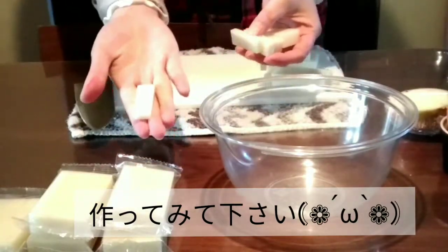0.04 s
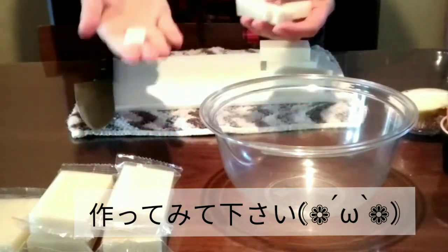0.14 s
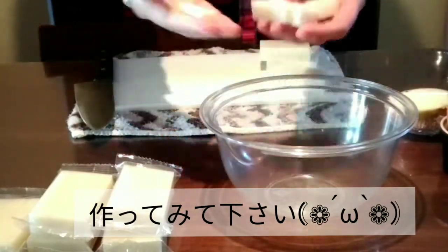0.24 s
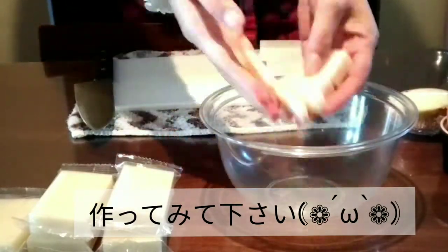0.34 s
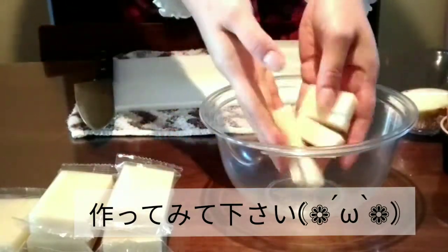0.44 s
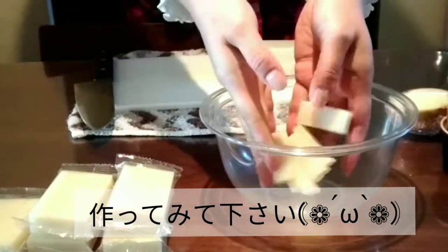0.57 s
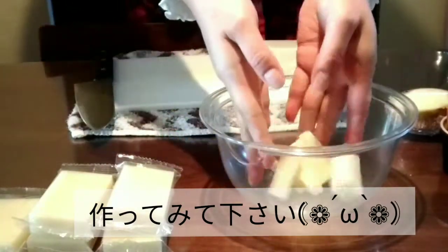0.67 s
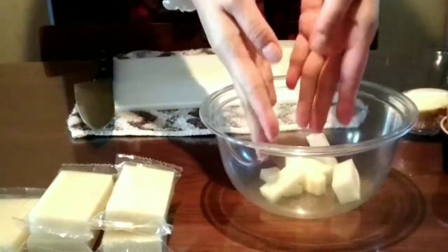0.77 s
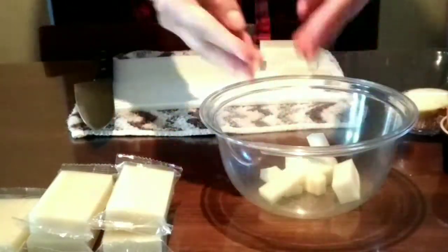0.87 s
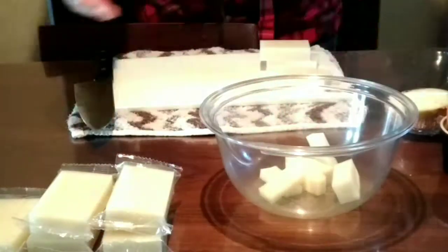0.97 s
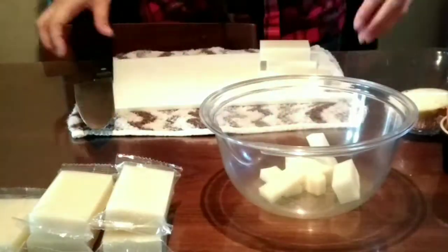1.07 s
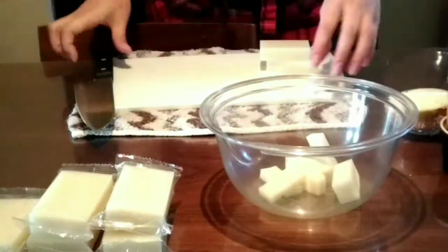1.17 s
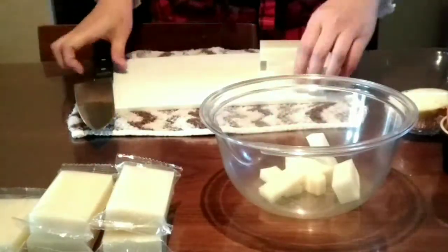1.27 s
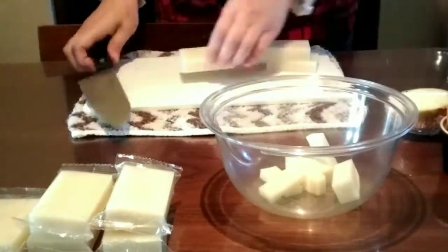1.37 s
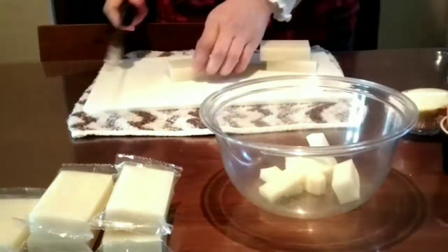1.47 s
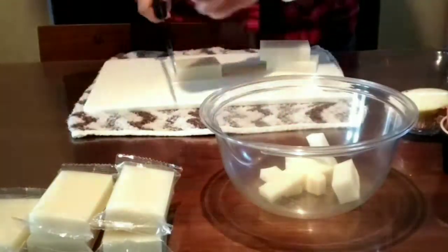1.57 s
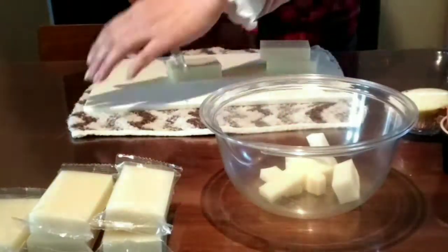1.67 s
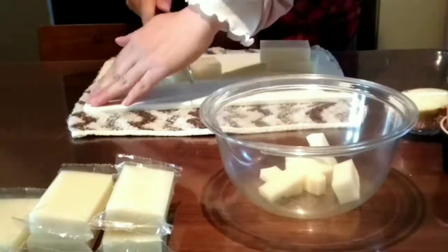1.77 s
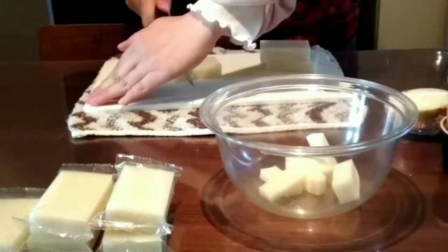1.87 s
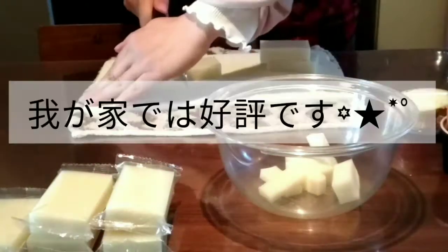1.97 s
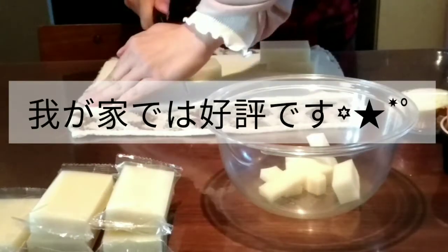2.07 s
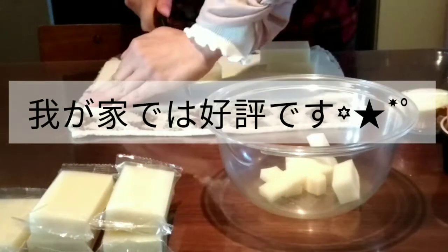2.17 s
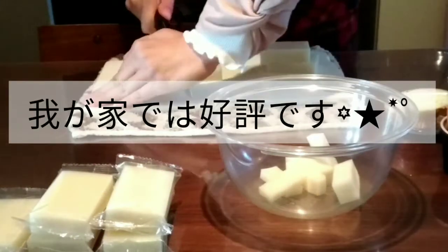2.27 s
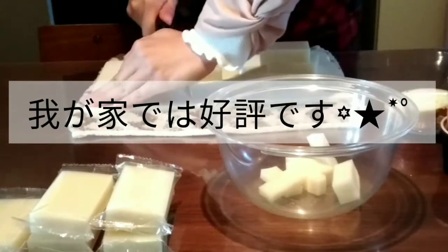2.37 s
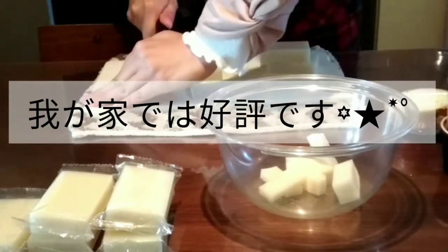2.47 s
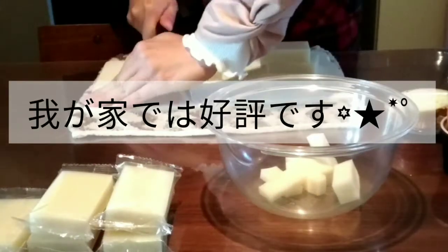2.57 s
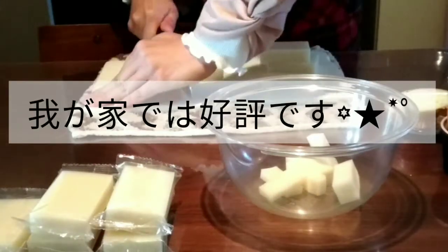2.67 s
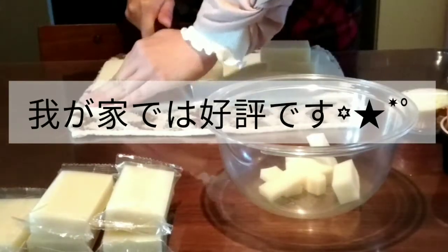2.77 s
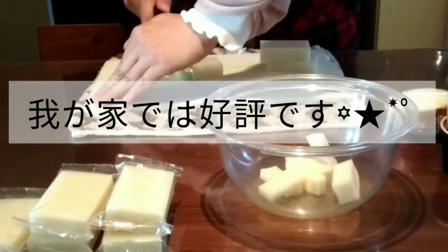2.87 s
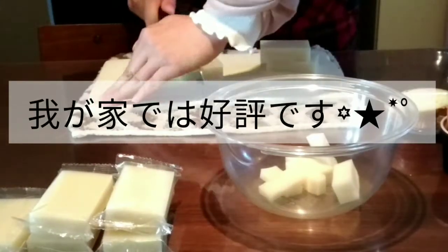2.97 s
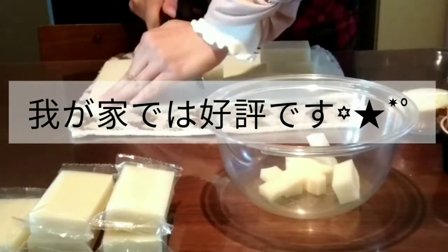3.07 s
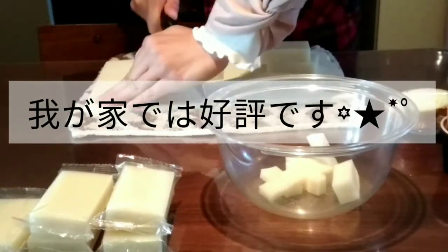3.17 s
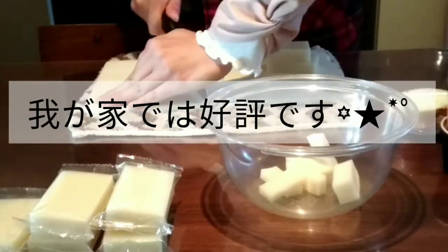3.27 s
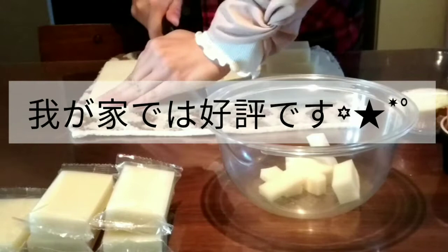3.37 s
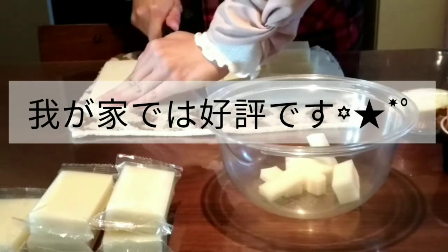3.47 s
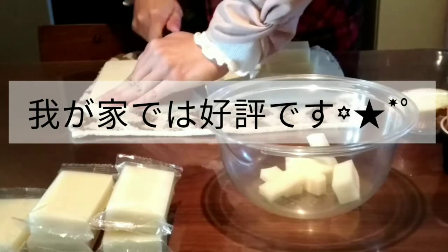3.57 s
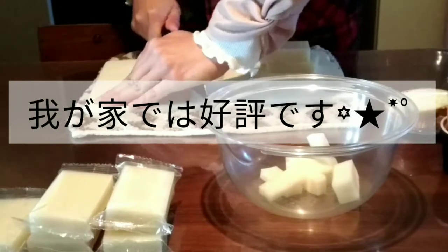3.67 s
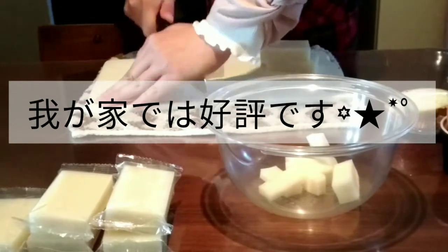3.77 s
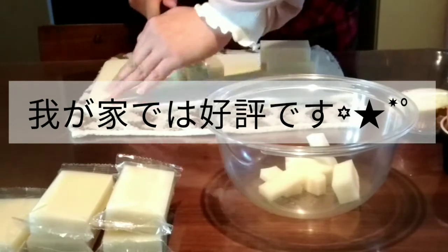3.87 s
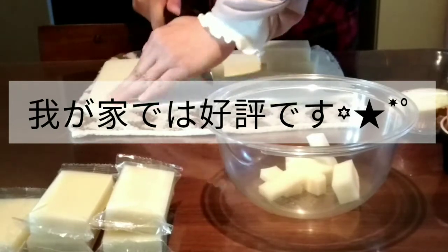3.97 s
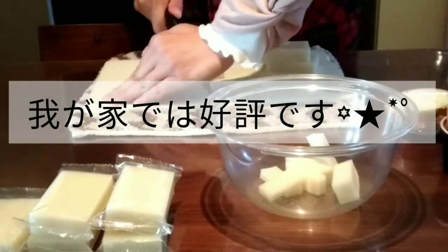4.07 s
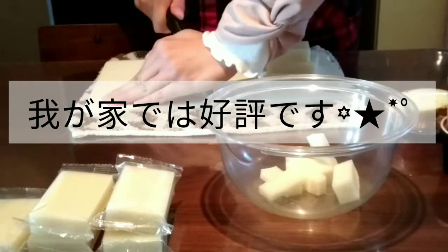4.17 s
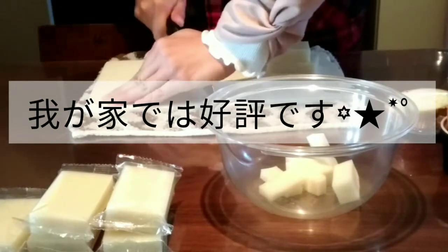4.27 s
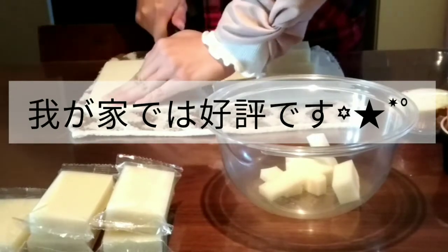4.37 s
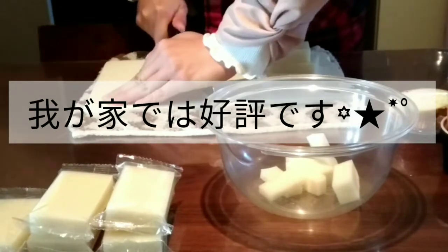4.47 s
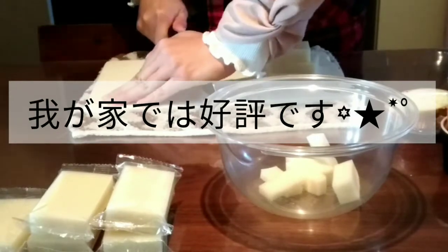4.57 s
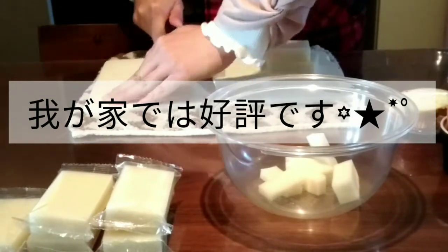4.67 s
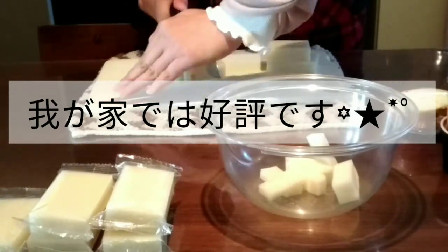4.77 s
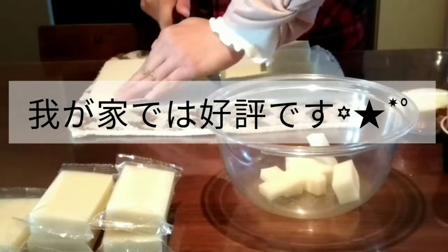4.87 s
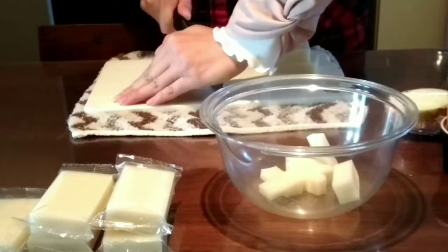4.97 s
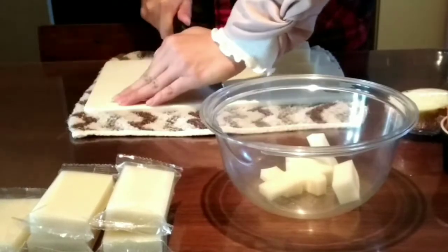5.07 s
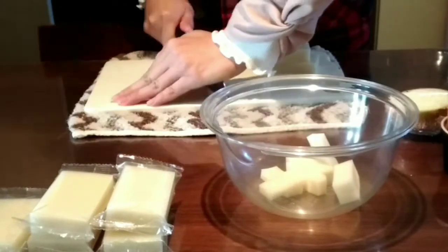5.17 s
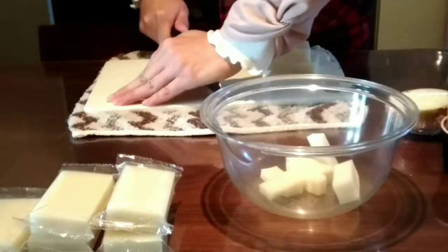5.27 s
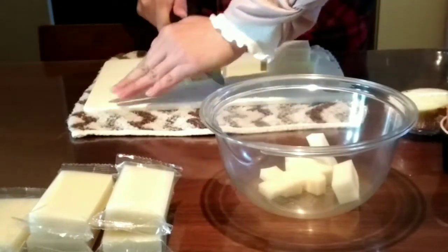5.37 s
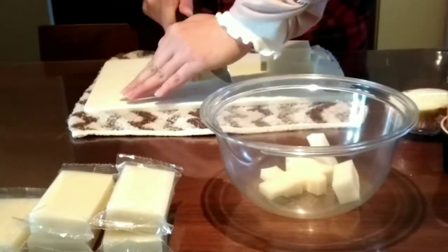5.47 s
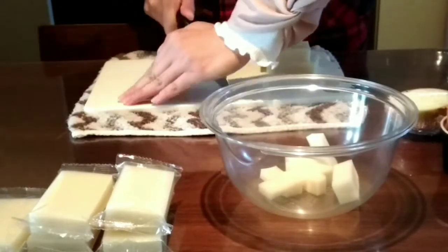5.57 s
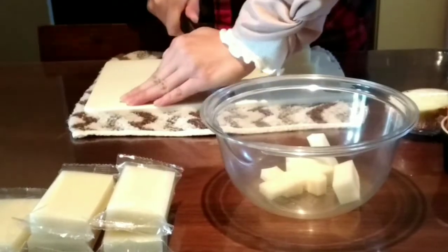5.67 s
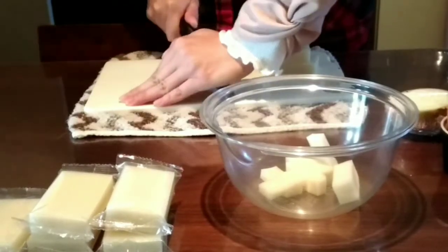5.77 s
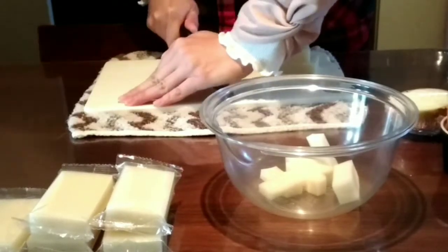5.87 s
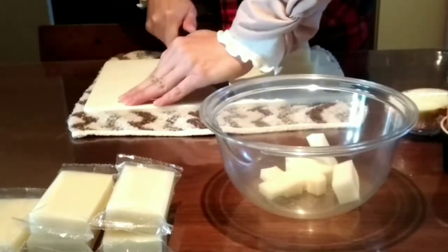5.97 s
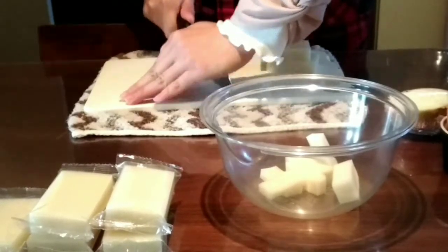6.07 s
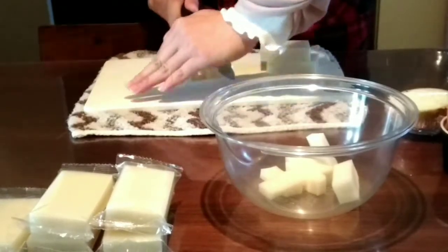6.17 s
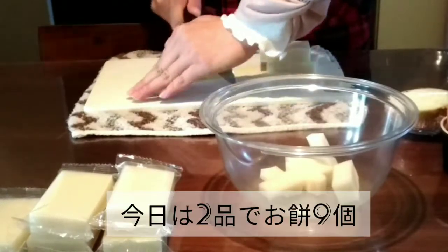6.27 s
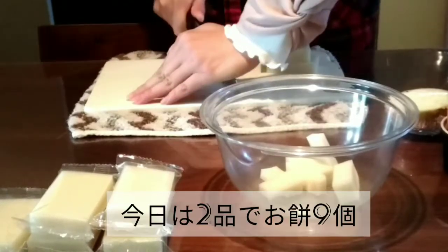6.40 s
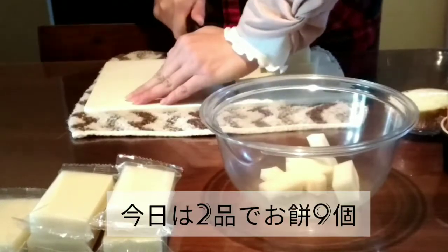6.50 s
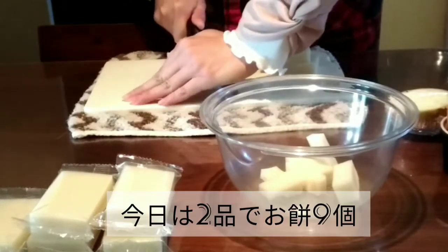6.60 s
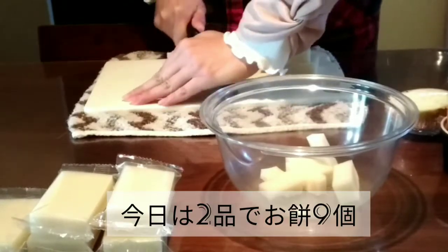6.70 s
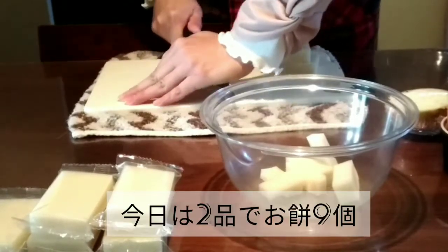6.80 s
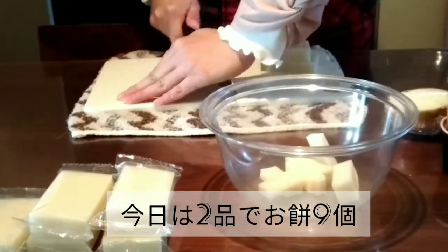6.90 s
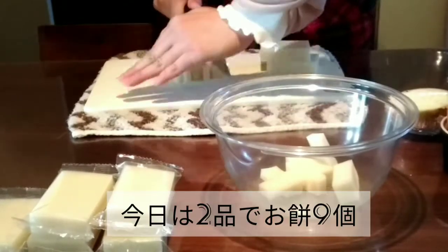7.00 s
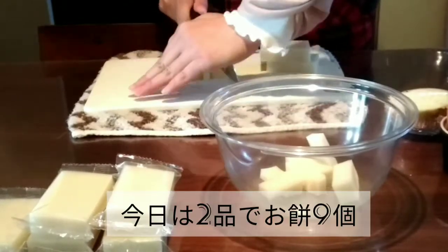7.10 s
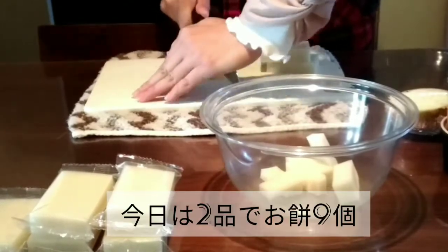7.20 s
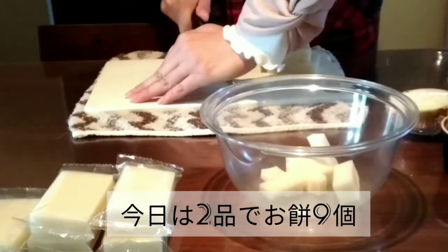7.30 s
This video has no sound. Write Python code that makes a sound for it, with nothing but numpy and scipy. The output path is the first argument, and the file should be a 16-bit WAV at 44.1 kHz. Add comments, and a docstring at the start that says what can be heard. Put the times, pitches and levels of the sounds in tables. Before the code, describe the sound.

A handful of hard rice cake pieces tumbles into a glass bowl with a quick clatter and a brief ring. Then a knife pushes through a hard block in slow, uneven strokes, knocking dully on a cloth-covered board. The block cracks and crunches, and loose pieces clack against the blade. The microphone is close, in a small quiet room with a low rumble and faint distant traffic.

```python
"""A small quiet room, the stereo microphones close to a wooden table where hard rice cake is cut up.
A handful of pieces tumbles into a glass bowl and rings it. Then a knife sticks and slips through the next
block and knocks on a cloth-covered board; the block cracks, and hard pieces clack against the blade.
A sleeve brushes past now and then, and far traffic swells under the room's rumble."""
import sys
import numpy as np
from scipy import signal
from scipy.fft import rfft, irfft, next_fast_len
from scipy.io import wavfile

SR = 44100
rng = np.random.default_rng(int(sys.argv[2]) if len(sys.argv) > 2 else 0)


def bounce(signal):
    """Save signal as a 16-bit WAV file at the path given by the first command-line argument."""
    frames = np.transpose(np.atleast_2d(signal))
    limited = np.clip(frames, -1, 1)
    pcm = np.round(limited * 32767).astype(np.int16)
    wavfile.write(sys.argv[1], SR, pcm)


N = 323782


def from_db(db):
    """Decibels to gain."""
    return 10 ** (np.asarray(db) / 20)


def rms_one(x):
    """Scale to unit rms."""
    return x / np.sqrt(np.mean(x ** 2) + 1e-20)


def at_hz(points, hz):
    """Read a table on a log-frequency axis."""
    knots, values = np.transpose(points)
    return np.interp(np.log(hz + 1), np.log(knots), values)


def cut(x, hz, kind, order=2):
    """Butterworth low- or high-pass."""
    sections = signal.butter(order, np.clip(hz, 10, .45 * SR), kind, fs=SR, output="sos")
    return signal.sosfilt(sections, x + 1e-18)


def add(track, s, sound):
    """Mix a short sound into a track at time s."""
    start = max(round(s * SR), 0)
    track[start:start + len(sound)] += sound[:N - start]


def delayed(x, s):
    """The same sound, s seconds later."""
    return np.interp(np.arange(N) - s * SR, np.arange(N), x, left=0)


def placed(x, lag_s, pan_db):
    """Place a source: the right microphone hears it lag_s later and pan_db weaker than the left."""
    left = delayed(x, -lag_s / 2) * from_db(pan_db / 2)
    right = delayed(x, lag_s / 2) * from_db(-pan_db / 2)
    return np.array([left, right])


def coloured(pair, spectrum):
    """Two unrelated signals become a stereo sound of this spectrum, alike in the bass."""
    # likeness of the two microphones: (frequency [Hz], correlation [-1..1])
    likeness = [(100, 0.91), (300, 0.87), (600, 0.44), (1100, -0.18), (2000, 0.035), (5000, 0.0088),
                (14000, -0.029)]
    size = pair.shape[1]
    padded = next_fast_len(size + 2000)
    hz = np.arange(padded // 2 + 1) * SR / padded
    alike = np.clip(at_hz(likeness, hz), -.95, .995)
    mid, side = rfft(pair, padded) * rms_one(from_db(at_hz(spectrum, hz)))
    stereo = np.sqrt(1 + alike) * mid + np.sqrt(1 - alike) * side * [[1], [-1]]
    return irfft(stereo, padded)[:, :size] / np.sqrt(2)


def noise(spectrum):
    """Steady stereo noise, rms about 1."""
    return coloured(rng.standard_normal((2, N)), spectrum)


def fractures(bursts, spectrum, grains_per_s, spread_db):
    """Tiny slips and fractures of uneven size crowd around each crack or rub."""
    t, power = np.arange(N) / SR, np.zeros(N)
    for peak_s, db, rise_s, fade_s in bursts:
        slopes = np.minimum((t - peak_s) / rise_s, (peak_s - t) / fade_s)
        power += from_db(db) ** 2 * np.exp(2 * np.maximum(slopes, -20))
    sizes = from_db(spread_db * np.minimum(rng.exponential(1, (2, N)), 4))
    signs = rng.choice([-1, 1], (2, N))
    slips = rng.random((2, N)) < grains_per_s / SR
    return coloured(rms_one(sizes * signs * slips) * np.sqrt(power), spectrum)


def struck(blows, modes, swell_cycles, scatter_db=3.0, detune=0.003):
    """Each blow rings the modes a little differently; low ones swell last, a soft contact dulls them."""
    t, out = np.arange(SR // 3) / SR, np.zeros(N)
    hz, level_db, t60 = np.array(modes).T[:, :, None]
    for s, db, contact_hz, *pitch_ratio in blows:
        spot, load = rng.standard_normal((2, len(modes), 1))
        cycles = hz * np.prod(pitch_ratio) * (1 + detune * load) * t
        fade = from_db(db + level_db + scatter_db * spot - 60 * t / t60)
        swell = 1 - np.exp(-cycles / swell_cycles)
        rings = fade * swell * np.sin(2 * np.pi * cycles)
        add(out, s, cut(rings.sum(0), contact_hz, "low"))
    return out


def room_tone(rumble_db=-63, hiss_db=-71):
    """The room's steady rumble and faint hiss."""
    # spectra of both: (frequency [Hz], relative level [dB])
    rumble = [(13, -11), (22, -11), (32, -6), (48, 2.5), (124, -6), (201, -2.5), (219, -3), (238, -12),
              (288, -8), (326, -11.5), (355, -6), (380, -11), (419, -10.5), (481, -14), (600, -17.5),
              (780, -49), (1320, -120)]
    hiss = [(350, -47), (600, -6), (761, -3.5), (903, -3), (1070, -3), (1320, -7.5), (1770, -8.5),
            (2150, -8.5), (2430, -11), (2960, -11), (3420, -12.5), (7240, -15.5), (14000, -22.5)]
    return from_db(rumble_db) * noise(rumble) + from_db(hiss_db) * noise(hiss)


def far_traffic(tyre_lead_s=0.3):
    """Distant vehicles swell and fade; their tyres are loudest on the approach."""
    # vehicles: (time when nearest [s], roar [dB], tyre hiss [dB], half length of the pass [s])
    passes = [(.35, -70, -95, 1), (4.9, -64.5, -72, 1), (7.45, -66.5, -75.5, 0.44)]
    # spectra from afar: (frequency [Hz], relative level [dB])
    road_roar = [(150, -0.5), (400, -2.5), (900, -2.5), (1400, -7), (2200, -11.5), (4000, -31.5)]
    tyre_hiss = [(900, -27), (1600, -3.5), (2300, 2.5), (3000, -9), (4500, -15.5), (9000, -64)]
    s, roar_db, tyre_db, half_s = np.array(passes).T[:, :, None]
    t = np.arange(N) / SR
    roar = np.linalg.norm(from_db(roar_db) / (1 + ((t - s) / half_s) ** 2), axis=0)
    tyres = np.linalg.norm(from_db(tyre_db) / (1 + ((t + tyre_lead_s - s) / half_s) ** 2), axis=0)
    return roar * noise(road_roar) + tyres * noise(tyre_hiss)


def room(x, near_db=-16.0, near_t60=0.044, far_db=-3.0, far_t60=0.22, gap_s=0.00299):
    """Dense quick reflections off the table and the things on it, then the room's short tail."""
    # spectrum of the reflections: (frequency [Hz], relative level [dB])
    room_colour = [(100, -35), (300, 13), (700, -5.5), (1500, 6.5), (3000, 0.5), (14000, 10.5)]
    t = np.arange(SR // 2) / SR
    fade = sum(from_db(db - 60 * t / t60) * np.sqrt(np.log(1e6) / (t60 * SR))  # db sets total energy
               for db, t60 in [(near_db, near_t60), (far_db, far_t60)])
    echoes = coloured(rng.standard_normal((2, len(t))) * fade, room_colour)
    return signal.fftconvolve(delayed(x, gap_s)[None], echoes, axes=1)[:, :N]


def sleeve():
    """Cloth brushes past in a faint, bright rustle."""
    # brushes: (peak time [s], level [dB], rise [s], fade [s])
    brushes = [(.83, -77, 0.054, 0.078), (1.415, -74, 0.063, 0.039), (1.485, -69, 0.016, .012),
               (2.64, -75.5, 0.33, 0.09)]
    # spectrum of the cloth: (frequency [Hz], relative level [dB])
    brush_colour = [(2000, -6), (5000, 9.5), (8000, 10.5), (14000, 3)]
    return fractures(brushes, brush_colour, grains_per_s=11000, spread_db=6.5)


def block():
    """The block whispers as it is slid into place, and crackles as a crack runs on through it."""
    # cracks and slides: (peak time [s], level [dB], rise [s], fade [s])
    splits = [(4.592, -45, 0.0055, 0.025), (5.054, -46.5, 0.0079, .024)]
    slides = [(1.7, -78, 0.24, 0.11), (2.0, -76, 0.045, 0.045)]
    # their spectra: (frequency [Hz], relative level [dB])
    split_colour = [(400, -28), (800, -3), (1100, 6), (1500, 0), (1900, -2), (2600, -8.5), (3500, -15),
                    (4500, -25), (9000, -45)]
    slide_colour = [(1800, -25), (2600, 0), (3050, 4), (3600, -18), (5000, -26), (12000, -36)]
    cracking = fractures(splits, split_colour, grains_per_s=4400, spread_db=4.0)
    sliding = fractures(slides, slide_colour, grains_per_s=13000, spread_db=1.0)
    return cracking + sliding


def friction(crunches, scrapes):
    """Dry cake crunches in fine grains; the blade and loose pieces scrape in coarser, duller ones."""
    # spectra of crunch and scrape: (frequency [Hz], relative level [dB])
    grit_colour = [(600, 9), (1500, 5.5), (2200, -3.5), (3100, 4), (4000, -2), (5000, -0.5), (6300, -4.5),
                   (8600, -3), (10200, -15.5), (14000, -21)]
    scrape_colour = [(250, -4.5), (550, -6.5), (850, -9), (1200, -9), (1700, -23), (2600, -32), (4000, -34),
                     (9000, -45)]
    crunch = fractures(crunches, grit_colour, grains_per_s=12000, spread_db=1.5)
    scrape = fractures(scrapes, scrape_colour, grains_per_s=5600, spread_db=4.5)
    return crunch + scrape


def table(thuds, decay_s=0.05, rebound_s=0.0428, rebound_db=-14.0):
    """A push shakes the table: the thud swells and dies, and the board settles back once on its cloth."""
    t, out = np.arange(SR // 3) / SR, np.zeros(N)
    age = t * np.log(1000) / decay_s
    for s, db, hz in thuds:
        add(out, s, from_db(db) * age * np.exp(1 - age) * np.sin(2 * np.pi * hz * t))
    return out + from_db(rebound_db) * delayed(out, rebound_s)


def cutting_board(jolts):
    """The board answers each jolt with a low, short knock."""
    # modes of the board: (frequency [Hz], level [dB], t60 [s])
    board_modes = [(106, -1.5, 0.063), (193, -4.5, 0.075), (294, -7.5, 0.047), (373, -2.5, 0.053),
                   (442, -7.5, .05), (527, -4, 0.033), (580, -3.5, 0.014), (854, -16.5, 0.055),
                   (1090, -26, 0.03), (1270, -28, 0.058), (1420, -34, 0.026)]
    return cut(struck(jolts, board_modes, swell_cycles=0.02), hz=61.0, kind="high")


def handful_in_bowl(crunch_rise_s=0.00098, crunch_fade_s=0.0092):
    """Each contact of the tumbling pieces is a blow on the glass and a short crunch."""
    # landings: (time [s], strength [dB], contact brightness [Hz], crunch [dB])
    drops = [(.4565, -54, 1000, -60), (0.4799, -60, 2000, -53), (0.505, -51.5, 1200, -60.5),
             (0.5497, -27.5, 1000, -37.5), (.564, -39.5, 700, -60), (0.568, -47, 900, -44),
             (0.5805, -36, 1400, -46), (0.592, -40, 400, -62), (.601, -36.5, 800, -48),
             (.608, -45, 1100, -43), (.626, -40, 352, -55), (0.6347, -39, 700, -41),
             (0.6427, -30.5, 1410, -47), (.647, -42, 800, -56)]
    # pieces rub on each other as they settle: (peak time [s], level [dB], rise [s], fade [s])
    rubs = [(.557, -47, .0022, 0.058), (.649, -44.5, 0.015, 0.012)]
    # modes of the glass: (frequency [Hz], level [dB], t60 [s])
    bowl_modes = [(117, -12, 0.052), (216.6, -8, 0.12), (279, -5.5, 0.041), (345, -6.5, 0.1),
                  (390, -9, 0.11), (520, -34, .07), (705, 5.5, 0.009), (790, -5, 0.017), (1270, -19, 0.04),
                  (1490, -11, 0.05), (2620, -25, 0.1), (2930, -17, 0.17), (2950, -16, 0.14),
                  (3100, -10, 0.13), (3260, -15, 0.13), (3540, -14, 0.11), (4530, -16, 0.23)]
    blows = [(s, db, hz) for s, db, hz, _ in drops]
    crunches = [(s + crunch_rise_s, db, crunch_rise_s, crunch_fade_s) for s, _, _, db in drops]
    glass = cut(struck(blows, bowl_modes, swell_cycles=0.14), hz=99, kind="high")
    return glass, rubs + crunches


def loose_pieces(flat_s=0.0075, flat_pitch=1.08):
    """A hard piece clacks on the blade or another piece, strikes again a moment later as it falls flat, and
    scrapes to rest."""
    # clacks: (time [s], clack [dB], second strike as it falls flat [dB], contact brightness [Hz], pitch [ratio,
    # high for a small piece], scrape [dB])
    clacks = [(.3378, -59.5, -70, 2000, 0.97, -87), (.457, -52.5, -62, 2000, 1.18, -70),
              (.5512, -21.5, -55, 656, .94, -50.5), (0.6337, -21.5, -40, 940, 1.04, -52),
              (1.323, -48, -61, 600, .88, -61), (1.336, -46, -66, 700, 0.78, -61),
              (1.3465, -47.5, -55, 800, 0.87, -66), (2.5231, -22.5, -39, 540, .9, -60),
              (3.6593, -29, -41, 2800, 0.99, -57), (4.563, -44.5, -66, 800, 0.92, -61),
              (4.5802, -31.5, -38.5, 2440, 0.98, -50.5), (4.614, -43, -56, 1600, 1.1, -61),
              (5.0406, -41, -37, 1800, 1.42, -51), (6.757, -56, -65, 900, 1.6, -57.5),
              (6.805, -54, -50, 650, 1.05, -56), (6.8165, -42, -44, 655, 1.07, -60)]
    # modes of a piece: (frequency [Hz], level [dB], t60 [s])
    piece_modes = [(689, -15, 0.076), (842, -19.5, 0.088), (851, 7.5, 0.013), (965, -17, 0.11),
                   (1033, -16, 0.063), (1254, -19.5, 0.087), (1530, -26, 0.07), (1800, 2, 0.0073),
                   (1870, -27, 0.043), (2430, -4, 0.012), (3270, -21, 0.034), (3530, -4.5, 0.0054)]
    scrape_lag_s, scrape_rise_s, scrape_fade_s = 0.012, 0.013, 0.025
    blows, scrapes = [], []
    for s, clack_db, flat_db, contact_hz, pitch, scrape_db in clacks:
        blows.append((s, clack_db, contact_hz, pitch))
        blows.append((s + flat_s, flat_db, contact_hz, pitch * flat_pitch))
        scrapes.append((s + scrape_lag_s, scrape_db, scrape_rise_s, scrape_fade_s))
    clacking = cut(struck(blows, piece_modes, swell_cycles=0.85), hz=420, kind="high")
    return clacking, scrapes


def knife(jolt_count=7, jolt_gap_s=0.0055, uneven=0.046, loss_db_per_span=10):
    """The blade sticks and slips in jolts, strongest at full force, with a thud, a crunch and a drag."""
    # blade or block is pushed onto the board: (time [s], bite from touch to full force [s], knock [dB],
    # contact brightness [Hz], board pitch [ratio], thud [dB], thud pitch [Hz], crunch [dB], drag [dB])
    strokes = [(1.2329, 0.0034, -42.5, 213, 1.06, -64, 80, -59.5, -65),
               (2.373, 0.0084, -41.5, 780, 0.97, -38, 78, -71, -52),
               (2.5232, 0.0004, -25.5, 710, .99, -34.5, 96, -50, -57),
               (2.5445, 0.00064, -36, 560, 0.96, -43, 62, -60, -70),
               (3.447, 0.0034, -63, 600, 1, -59, 79, -59.5, -86),
               (4.073, 0.0013, -46.5, 182, 1, -63, 78.5, -70, -70),
               (4.419, 0.0055, -49, 150, 0.97, -43.5, 78, -61.5, -73),
               (5.039, 0.0097, -33, 516, 0.963, -31, 70, -49, -36),
               (5.074, 0.00041, -36, 450, 0.87, -66, 60, -71, -63),
               (5.789, 0.0056, -48.5, 260, 0.92, -39, 79.5, -54.5, -69),
               (6.642, 0.011, -42.5, 272, 1.05, -35, 78, -57, -55)]
    shortest_span_s, drag_lag_s = 0.0054, 0.0034
    crunch_rise, crunch_fade, drag_rise, drag_fade = 0.34, 1.82, 0.37, 1.93  # in spans
    jolts, thuds, crunches, drags = [], [], [], []
    for s, bite, knock_db, contact_hz, pitch, thud_db, thud_hz, crunch_db, drag_db in strokes:
        span = shortest_span_s + bite  # a slow bite draws the stroke out
        for age in jolt_gap_s * np.arange(jolt_count) * (1 + uneven * rng.standard_normal(jolt_count)):
            jolt_db = knock_db - loss_db_per_span * abs(age - bite) / span
            jolts.append((s + age, jolt_db, contact_hz, pitch))
        thuds.append((s + 0.72 * bite, thud_db, thud_hz))  # starts just before full force
        crunches.append((s + bite, crunch_db, crunch_rise * span, crunch_fade * span))
        drags.append((s + bite + drag_lag_s, drag_db, drag_rise * span, drag_fade * span))
    return jolts, thuds, crunches, drags


def scene():
    """Bowl, board and pieces sound close by, each from its own place near the middle of the table."""
    jolts, thuds, cut_crunches, drags = knife()
    bowl, bowl_crunches = handful_in_bowl()
    handful_thud = (.553, -37.5, 113)  # its weight shakes the table: (time [s], level [dB], pitch [Hz])
    board = cutting_board(jolts) + table(thuds + [handful_thud])
    pieces, scrapes = loose_pieces()
    direct = (placed(bowl, lag_s=-0.000068, pan_db=1.0)
              + placed(board, lag_s=0.00004, pan_db=0.5)
              + placed(pieces, lag_s=0.0001, pan_db=0.5))
    rubbing = friction(bowl_crunches + cut_crunches, drags + scrapes) + block() + sleeve()
    reflections = room(from_db(-5.5) * bowl + from_db(-7.0) * board + pieces)
    return direct + reflections + rubbing + room_tone() + far_traffic()


def record(dry):
    """The microphones lose the deepest bass, the left one is a little louder, and the top ends steeply."""
    heard = cut(dry, hz=35.5, kind="high") * from_db([[.2], [-.2]])
    cutoff_hz = 14350
    return signal.sosfilt(signal.ellip(12, .1, 90, cutoff_hz, fs=SR, output="sos"), heard)


dry = scene()
out = record(dry)
bounce(out)
```